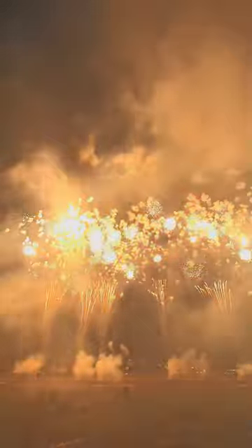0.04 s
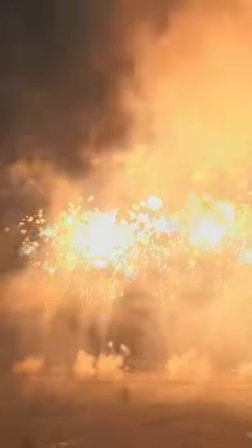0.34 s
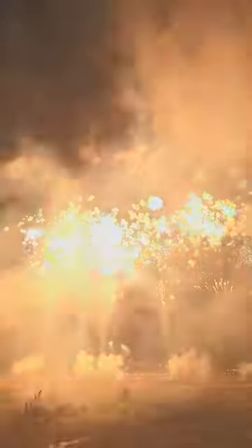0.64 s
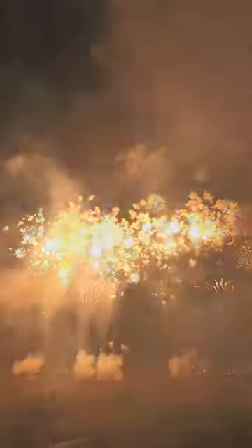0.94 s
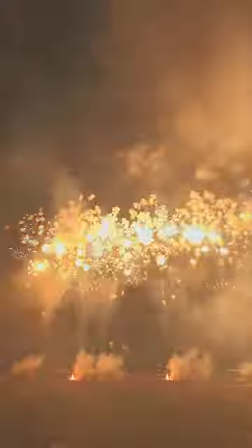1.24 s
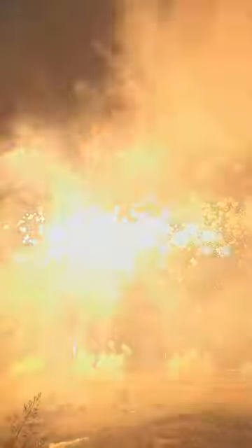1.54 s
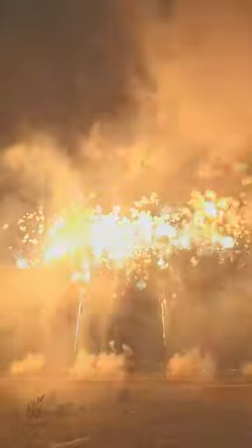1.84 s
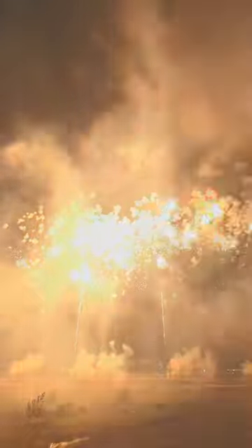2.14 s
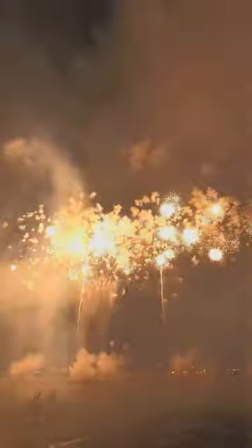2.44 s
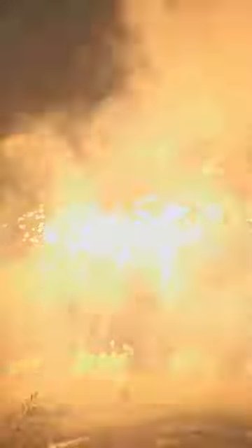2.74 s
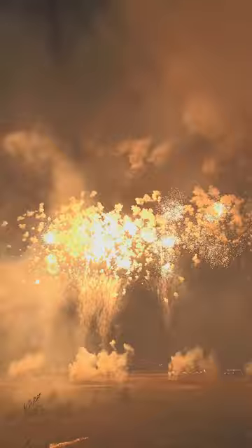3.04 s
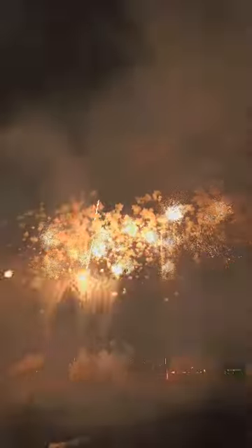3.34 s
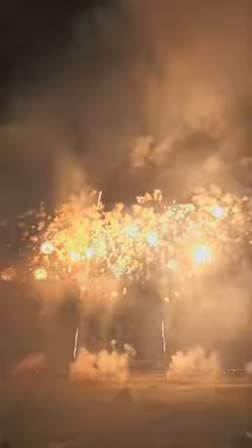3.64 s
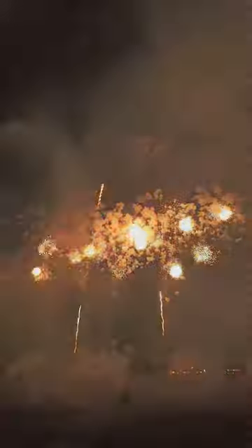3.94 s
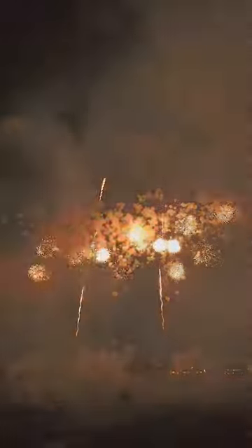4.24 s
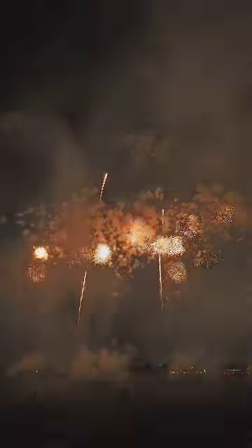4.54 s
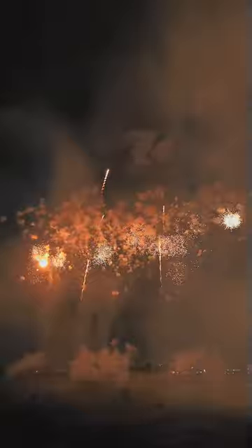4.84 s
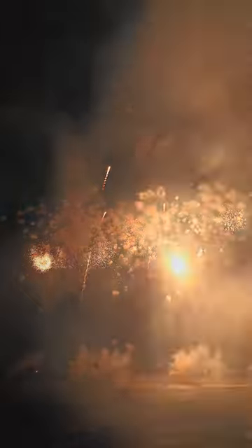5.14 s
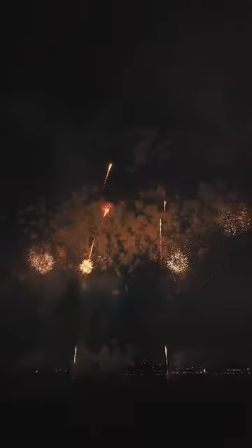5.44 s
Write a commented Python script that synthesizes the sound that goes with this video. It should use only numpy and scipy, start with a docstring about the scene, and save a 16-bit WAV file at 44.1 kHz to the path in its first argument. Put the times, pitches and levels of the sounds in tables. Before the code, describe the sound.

Fireworks burst in crowded salvos across a river at night, sharp, punchy bangs following one another many times a second. Small stars pop between them, over a low rumble, a few deep thuds and a faint sizzle. After about four seconds the small pops fade and the bangs become more separate, ending with a brief gap and a last quick cluster. The stereo microphone hears it from the bank, with echoes over the water.

```python
"""Sharp reports of fireworks crack across a river at night, in crowded salvos that thin out at the end.
Each burst is a steep shock with a suction phase; it reflects off the near bank, scatters in the grass
and reverberates over the water. Small stars pop between the big reports, ever more sparsely near the end.
Underneath lie a low rumble, a few deep thuds and the faint sizzle of burning stars."""
import sys
import numpy as np
from scipy import signal
from scipy.fft import rfft, irfft, next_fast_len
from scipy.io import wavfile
from scipy.ndimage import uniform_filter1d, map_coordinates

SR = 44100
rng = np.random.default_rng(int(sys.argv[2]) if len(sys.argv) > 2 else 0)


def digitize_waveform(pressure):
    """Quantize a signal to 16-bit integers and store it at the path in sys.argv[1].

    Rows of a 2-D input are taken as channels; values are limited to [-1, 1].
    """
    field = np.atleast_2d(pressure).T
    bounded = np.clip(field, -1, 1)
    quanta = np.round(bounded * 32767).astype(np.int16)
    wavfile.write(sys.argv[1], SR, quanta)


N = 250915
REPORT_SAMPLES = 8192
HZ = np.fft.rfftfreq(REPORT_SAMPLES, 1 / SR)

# spectra of the rumble and of the sizzle: (frequency [Hz], relative level [dB])
RUMBLE_SPECTRUM = [(15, -35), (30, -33), (62, -2.5), (100, -1.5), (200, -18), (500, -40), (2000, -90)]
SIZZLE_SPECTRUM = [(20, -22), (120, 9), (210, 11), (380, 4), (550, 6), (1000, 3), (2500, -9), (5000, -13),
                   (8000, -25), (14000, -43)]
# slow course of the rumble: (time [s], relative level [dB])
RUMBLE_LEVEL = [(0, -41), (.8, -44), (2.3, -40), (2.9, -44), (4.2, -41), (4.9, -45), (5.69, -53)]
# thuds of the heaviest charges: (time [s], relative level [dB])
THUDS = [(0.588, -28), (1.313, -25), (2.119, -29), (3.219, -30), (3.556, -30), (4.619, -28), (5.449, -33)]
# likeness of diffuse sound on the left and right: (frequency [Hz], coherence [1])
COHERENCE = [(100, 1), (300, 1), (600, 0.97), (1100, 0.96), (1600, .78), (2200, 0.74), (2700, 0.16),
             (3600, 0.066), (3850, 0.24), (5000, 0.65), (7000, -0.027), (14000, -0.011)]
# colour of the far echo: (frequency [Hz], relative level [dB])
ECHO_SPECTRUM = [(50, -3), (130, -7.5), (200, -6.5), (290, -13.5), (390, -17), (530, -8.5), (750, -12),
                 (1100, -11), (2200, -9), (4500, -9), (9000, -9), (14000, -22)]
# reverberation time of the far echo: (frequency [Hz], time to fall 60 dB [s])
ECHO_T60 = [(60, 2), (300, 0.66), (1500, 0.87), (5000, 0.65), (12000, .5)]
# scattering by grass and stones: (frequency [Hz], gain [dB])
SCATTER_GAIN = [(60, -5), (250, -9), (600, -0.5), (1200, -2), (2500, 5.5), (5000, 7), (9000, 6.5),
                (14000, 13.5)]
# reflections off the near bank: (delay [s], gain [dB], cutoff [Hz])
BANK_REFLECTIONS = [(.00384, 0.34, 800), (.00713, -2.5, 223)]
# spectrum of one shock: (frequency [Hz], relative level [dB])
SHOCK_SPECTRUM = [(20, -75), (38, -30), (58, -8), (120, -0.5), (200, 1.5), (330, -2.5), (600, -10),
                  (1200, -17.5), (2400, -31), (3300, -34), (5000, -32.5), (8000, -45), (13000, -60),
                  (16000, -95)]
# popping stars: (time [s], mean rate [1/s], relative level [dB])
STAR_POPS = [(0, 45, -22.5), (3.3, 45, -24), (3.7, 16, -34), (4.3, 10, -40), (5, 8, -46), (5.7, 6, -52)]
# salvos, duration 0 being one shell: (time [s], duration [s], relative level [dB], treble gain [dB])
SALVOS = [(.001, .017, -15, 1), (.051, .025, -13.5, -1), (.095, .04, -14.5, 0), (.16, 0, -11.5, -1),
          (.186, .046, -18, 0), (.265, .01, -16, -1), (.31, .02, -14, 1), (.377, .03, -15, -1),
          (.428, .032, -17, -4), (.496, .058, -18.5, -1), (.567, .036, -13, 0), (.65, .028, -14.5, 0),
          (.726, 0, -17.5, 2.5), (.796, .009, -14, 1), (.829, .01, -16, 0), (.886, .035, -19.5, -1),
          (.946, 0, -15.5, 1), (.986, .012, -18.5, 0), (1.025, .078, -15.5, 1), (1.139, 0, -19, 0),
          (1.198, .002, -13.5, -1.5), (1.216, .012, -15.5, -2), (1.248, .024, -17, 0), (1.309, 0, -12.5, 3),
          (1.329, .013, -16.5, 0), (1.365, .075, -16, -1), (1.465, .029, -16.5, -2), (1.534, 0, -16.5, -3),
          (1.573, .006, -16, 0), (1.612, .003, -13, -3), (1.657, 0, -14.5, 2), (1.697, .071, -17.5, -1),
          (1.801, .006, -16, 1), (1.843, 0, -13.5, 0), (1.884, 0, -16, 1.5), (1.921, .007, -12, -2.5),
          (1.953, 0, -15.5, -2), (1.99, .01, -19, -2), (2.039, .016, -19, 0), (2.082, .028, -15, -2.5),
          (2.14, .022, -19.5, -5), (2.179, .014, -13, -2), (2.206, .079, -16.5, -1), (2.296, 0, -12, .5),
          (2.344, .003, -15, -5), (2.374, 0, -14.5, 0), (2.408, 0, -15.5, 2.5), (2.437, .007, -16.5, 2),
          (2.481, .043, -18, 1), (2.572, .012, -15, 4.5), (2.616, .028, -14, -1), (2.666, .006, -15, 1),
          (2.712, .045, -14.5, -2), (2.805, 0, -16.5, 2.5), (2.829, .008, -18, 4), (2.86, .003, -14.5, -1),
          (2.891, 0, -19, 1.5), (2.935, .045, -13.5, -2), (3.014, .084, -16.5, 0), (3.109, 0, -11.5, -1),
          (3.165, 0, -17, 0), (3.2, 0, -19, 2.5), (3.239, .017, -16.5, 0), (3.291, .037, -17.5, 0),
          (3.362, 0, -16.5, 0), (3.391, .019, -16, 0), (3.451, 0, -17, -1), (3.496, 0, -20, 0),
          (3.534, 0, -19.5, 0), (3.551, .029, -14, -2), (3.62, 0, -14, -2), (3.66, .005, -14, 2.5),
          (3.748, .024, -14, -4), (3.91, .013, -17.5, 2.5), (3.95, 0, -19, 4), (3.979, .019, -19.5, -1),
          (4.02, 0, -13.5, -2), (4.087, 0, -12, -.5), (4.119, .017, -17.5, -1), (4.163, .005, -13.5, -1.5),
          (4.212, 0, -16, 2.5), (4.278, 0, -19.5, -4.5), (4.374, .021, -17, -2), (4.437, .021, -13.5, -2),
          (4.478, 0, -13, -3), (4.524, 0, -17, -3), (4.586, 0, -17, 4.5), (4.607, .015, -14, 2),
          (4.653, 0, -18, -4), (4.728, .003, -15.5, 1), (4.765, 0, -16.5, -2), (4.794, .005, -16, 1),
          (4.825, 0, -18, 0), (4.904, .018, -17, 3), (4.943, 0, -12.5, -1.5), (4.971, 0, -17, 3),
          (5.122, 0, -40, 10), (5.206, 0, -16.5, 1), (5.406, 0, -41, 8), (5.444, 0, -16, -5.5),
          (5.47, 0, -14, 1), (5.522, 0, -17.5, 1.5)]
# unequal resonances of the two microphone ports: (frequency [Hz], left minus right [dB])
PORT_IMBALANCE = [(5400, -0.15), (6100, 4), (6650, 9.5), (7300, .5), (8200, -3.5), (9500, -2.5),
                  (12000, -2), (14000, 1.5)]


def amp(db):
    """Amplitude grows tenfold for every 20 dB."""
    return 10 ** (np.asarray(db) / 20)


def unit(x):
    """Normalisation to rms 1."""
    return x / np.sqrt(np.mean(x ** 2) + 1e-20)


def along(points, hz):
    """Interpolation of (frequency, value) points on a logarithmic axis."""
    knots_hz, values = np.transpose(points)
    return np.interp(np.log(hz + 1), np.log(knots_hz + 1), values)


def curves(rows):
    """Linear interpolation in time: one value per sample for each later column."""
    times, *columns = np.transpose(rows)
    return [np.interp(np.arange(N) / SR, times, column) for column in columns]


def add(track, sound, time_s):
    """Superposition: a report adds to the pressure already there."""
    start = int(np.clip(round(time_s * SR), 0, N - 1))
    track[:, start:start + REPORT_SAMPLES] += sound[:, :N - start]


def diffuse(noise_pair, spectrum):
    """Partial coherence: a diffuse field is alike on both sides in the bass, unlike in the treble."""
    size = noise_pair.shape[-1]
    hz = np.fft.rfftfreq(size, 1 / SR)
    angle = np.arccos(np.clip(along(COHERENCE, hz), -1, 1)) / 2
    mid, side = rfft(noise_pair) * amp(along(spectrum, hz)) * [np.cos(angle), np.sin(angle)]
    return irfft([mid + side, mid - side], size)


def steady_noise(spectrum):
    """A stationary diffuse field of rms 1."""
    return unit(diffuse(rng.standard_normal((2, next_fast_len(N))), spectrum)[:, :N])


def sizzle(level_db=-56):
    """Combustion noise: burning stars give a faint, steady hiss."""
    return amp(level_db) * steady_noise(SIZZLE_SPECTRUM)


def thud_envelope(attack_s=.015, t60_s=.4):
    """Exponential decay: each deep thud swells quickly and dies away."""
    onset_s, db = np.transpose(THUDS)[:, :, None]
    age = np.maximum(np.arange(N) / SR - onset_s, 0)
    return np.sum(amp(db - 60 * age / t60_s) * (1 - np.exp(-age / attack_s)), axis=0)


def rumble(gain_db=-5, thud_db=-4, swell_db=3, swells_per_s=9, width_db=-22):
    """Incoherent summation: far booms merge into low noise that heaves and rises with each thud."""
    course_db, = curves(RUMBLE_LEVEL)
    knots = rng.standard_normal(int(N * swells_per_s / SR) + 4)
    swell = map_coordinates(knots, [np.arange(N) * swells_per_s / SR])
    envelope = amp(course_db + gain_db + swell_db * swell) + amp(thud_db) * thud_envelope()
    side = amp(width_db) * steady_noise(RUMBLE_SPECTRUM)[0] * np.array([[1], [-1]])
    return envelope * (steady_noise(RUMBLE_SPECTRUM) + side)


def shore_echo(sky, build_s=.0041, patchy_db=3, stretches=16):
    """Reverberation: far shores answer in uneven patches, by new paths for each stretch of the barrage."""
    echo = np.zeros((2, N + 2 * SR))
    mono = sky.mean(axis=0)
    step = N // stretches + 1
    for start in range(0, N, step):
        hz, t, noise = signal.stft(rng.standard_normal((2, SR)), SR, nperseg=256)
        patches_db = patchy_db * unit(uniform_filter1d(rng.standard_normal(len(t)), size=6))
        fade = amp(patches_db - 60 * t / along(ECHO_T60, hz)[:, None]) * (1 - np.exp(-t / build_s))
        fade /= np.sqrt(np.mean(fade ** 2, axis=1, keepdims=True) * SR)  # equal energy in each band
        _, tail = signal.istft(noise * fade, SR, nperseg=256)
        response = diffuse(tail[:, :SR], ECHO_SPECTRUM)
        answer = signal.fftconvolve(mono[None, start:start + step], response, axes=1)
        echo[:, start:start + answer.shape[1]] += answer
    return echo[:, :N]


def grass_scatter(onset_s=.0024, near_t60_s=.085, far_t60_s=.2, far_db=-14, grain_db=3):
    """Scattering: the frequency response of many tiny reflections, a dense clump and then a thin trail."""
    age = np.maximum(np.arange(REPORT_SAMPLES) / SR - onset_s, 0)
    fade = (age > 0) * np.hypot(amp(-60 * age / near_t60_s), amp(far_db - 60 * age / far_t60_s))
    grains = amp(grain_db * np.repeat(rng.standard_normal(REPORT_SAMPLES // 32), 32))
    spray = unit(rng.standard_normal((2, REPORT_SAMPLES)) * fade * grains) / np.sqrt(REPORT_SAMPLES)
    return rfft(diffuse(spray, SCATTER_GAIN))


def reflection(delay_s, db, cutoff_hz):
    """Rough-surface reflection: a delay and a low-pass, which blurs the sharp front."""
    return amp(db) * np.exp(-2j * np.pi * HZ * delay_s) / (1 + (HZ / cutoff_hz) ** 2)


def shock_wave():
    """Minimum phase: the spectrum of a pulse of peak 1 whose energy all follows a steep front."""
    cepstrum = irfft(np.log(amp(along(SHOCK_SPECTRUM, HZ))))
    cepstrum[1:REPORT_SAMPLES // 2] *= 2
    cepstrum[REPORT_SAMPLES // 2 + 1:] = 0
    spectrum = np.exp(rfft(cepstrum))
    return spectrum / irfft(spectrum).max()


def report(shock, crack_db, lag_spread_s=.000035, crack_hz=1200):
    """Multipath propagation: the direct shock interferes with its reflections and its scatter."""
    bearing, height, reach = rng.standard_normal(3)
    # the nearer side hears the front first
    lag = np.exp(np.pi * 1j * HZ * lag_spread_s * bearing * np.array([[1], [-1]]))
    detour = 1 + .043 * height  # the height of the burst changes the reflected path
    bank = sum(reflection(delay_s * detour, db, cutoff_hz) for delay_s, db, cutoff_hz in BANK_REFLECTIONS)
    # soft ground further off sends back a dull, inverted slap
    slap = -reflection(delay_s=.018 * np.exp(.1746 * reach), db=-11, cutoff_hz=600)
    paths = lag * (1 + bank) + slap + grass_scatter()
    crack = amp(crack_db * HZ / (HZ + crack_hz))  # steeper fronts crack more brightly
    fade_out = np.minimum(1, np.linspace(8, 0, REPORT_SAMPLES))
    return irfft(shock * crack * paths) * fade_out


def stars(shock, gain_db=-1.5, crack_db=-9, spread_db=4):
    """A Poisson process: stars pop independently, each a weak, dull shock."""
    pops = np.zeros((2, N))
    rate, level_db = curves(STAR_POPS)
    for i in np.flatnonzero(rng.random(N) < rate / SR):
        pop_db = level_db[i] + gain_db - spread_db * rng.standard_exponential()
        add(pops, amp(pop_db) * report(shock, crack_db), i / SR)
    return pops


def burst_times(start_s, duration_s, gap_s=.015, fuse_jitter=.25):
    """Timing jitter: uneven fuses upset the steady pace between a salvo's first and last shell."""
    gaps = int(max(round(duration_s / gap_s), duration_s > 0))
    place = np.arange(gaps + 1.)
    place[1:-1] += fuse_jitter * rng.standard_normal(gaps + 1)[1:-1]
    return start_s + duration_s * place / max(gaps, 1)


def shells(shock, big_db=.9, spread_db=.8, small_db=-6.5, small_gap_s=.025, trail_s=.008):
    """Blast waves: each shell of a salvo radiates one shock, with small shells among the big ones."""
    bursts = np.zeros((2, N))
    for start_s, duration_s, db, crack_db in SALVOS:
        for time_s in burst_times(start_s, duration_s):
            size_db = spread_db * rng.standard_normal() * (duration_s > 0)
            burst = report(shock, crack_db - size_db)  # bigger shells sound duller
            add(bursts, amp(db + big_db + size_db) * burst, time_s)
        for place in rng.random(round(duration_s / small_gap_s)):
            time_s = start_s + place * (duration_s + trail_s)
            add(bursts, amp(db + small_db) * report(shock, crack_db), time_s)
    return bursts


def scene():
    """Superposition of the barrage, its echo, the rumble and the sizzle."""
    shock = shock_wave()
    sky = shells(shock) + stars(shock)
    return sky + shore_echo(sky) + rumble() + sizzle()


def record(dry, band_limit_hz=15600):
    """Port resonance colours each microphone's channel; nothing passes above the band limit."""
    size = next_fast_len(N + REPORT_SAMPLES)
    hz = np.fft.rfftfreq(size, 1 / SR)
    ports = amp(along(PORT_IMBALANCE, hz) * np.array([[.5], [-.5]]))
    return irfft(rfft(dry, size) * ports * (hz < band_limit_hz), size)[:, :N]


dry = scene()
out = record(dry)
digitize_waveform(out)
```